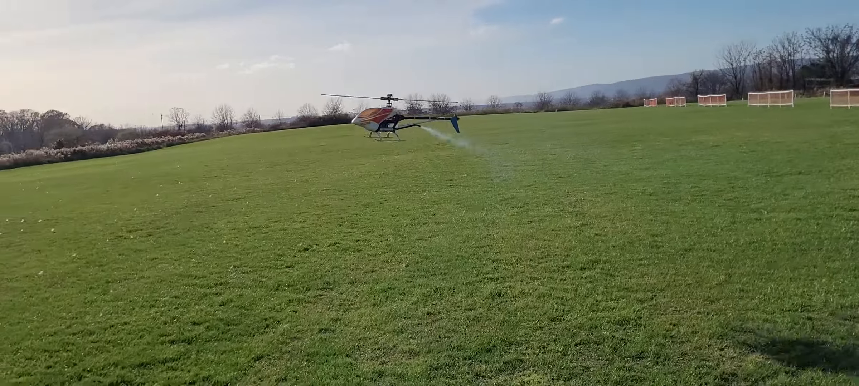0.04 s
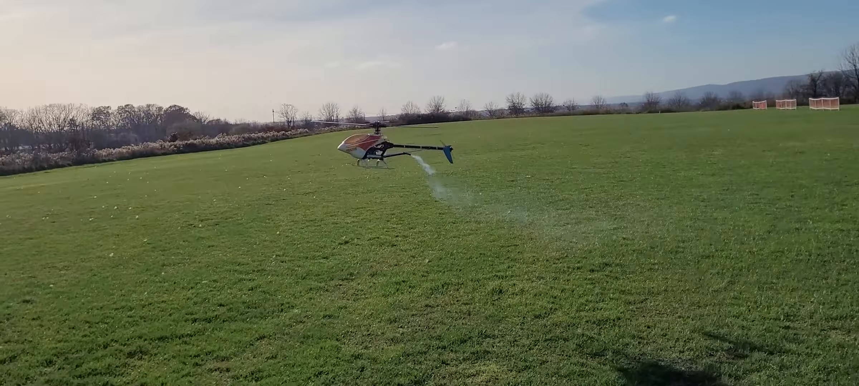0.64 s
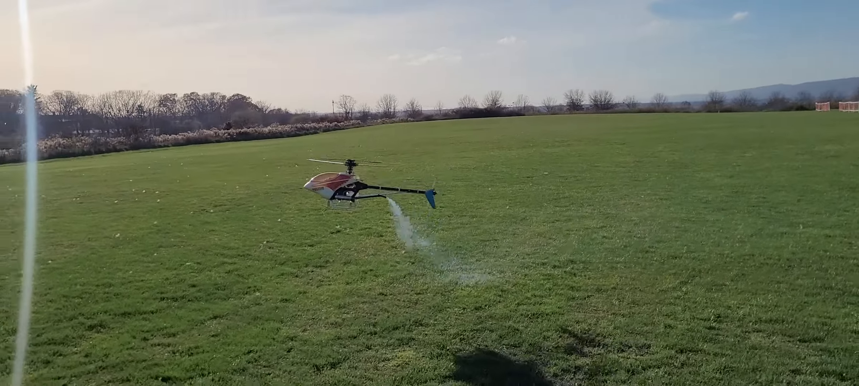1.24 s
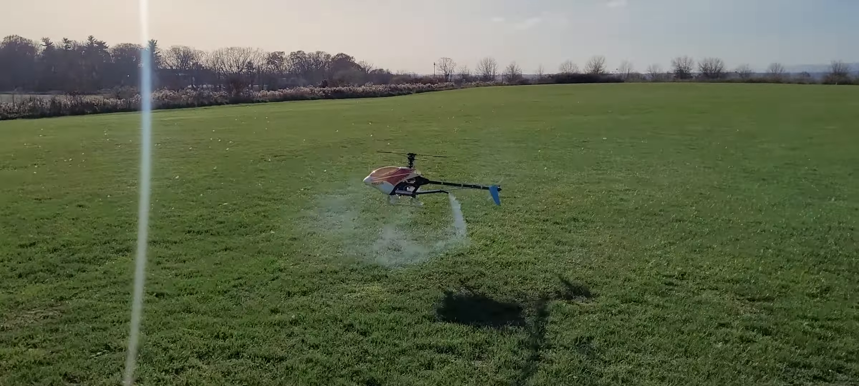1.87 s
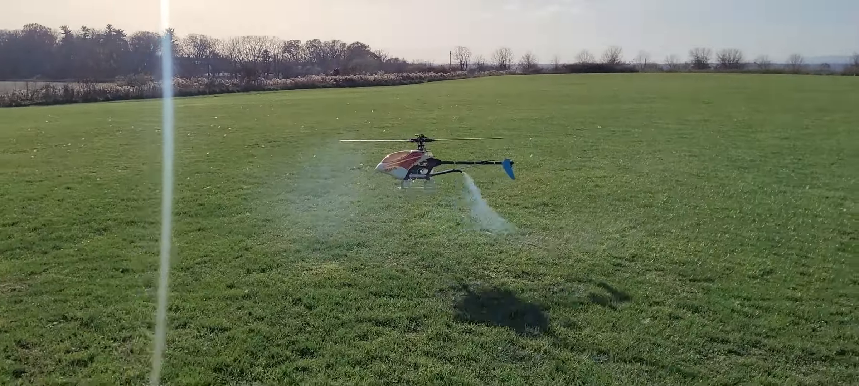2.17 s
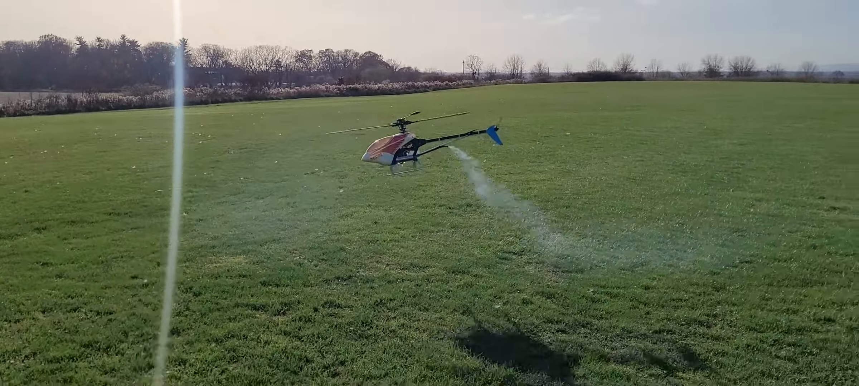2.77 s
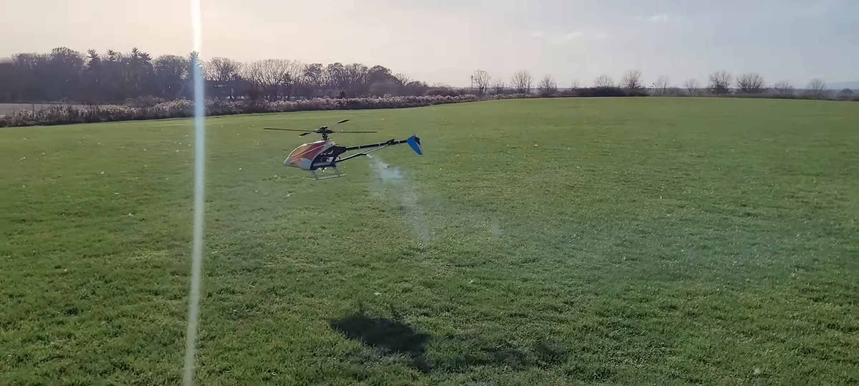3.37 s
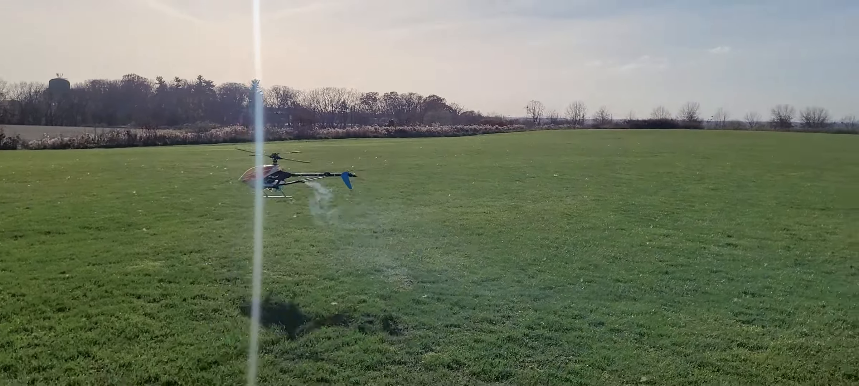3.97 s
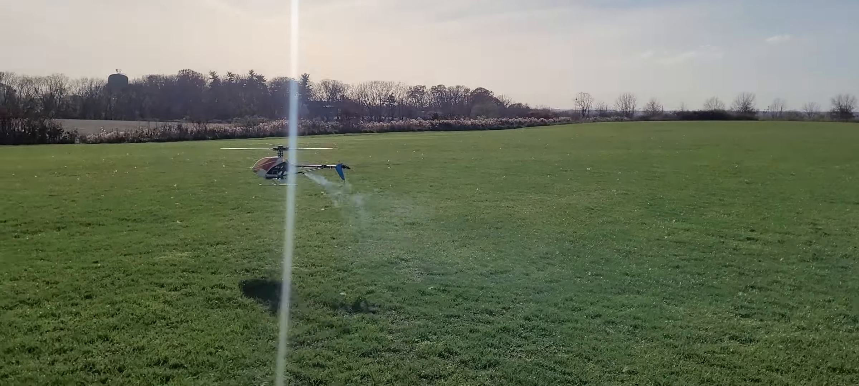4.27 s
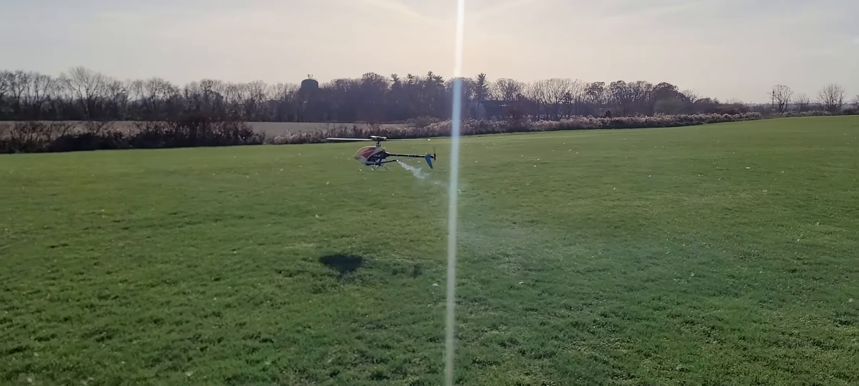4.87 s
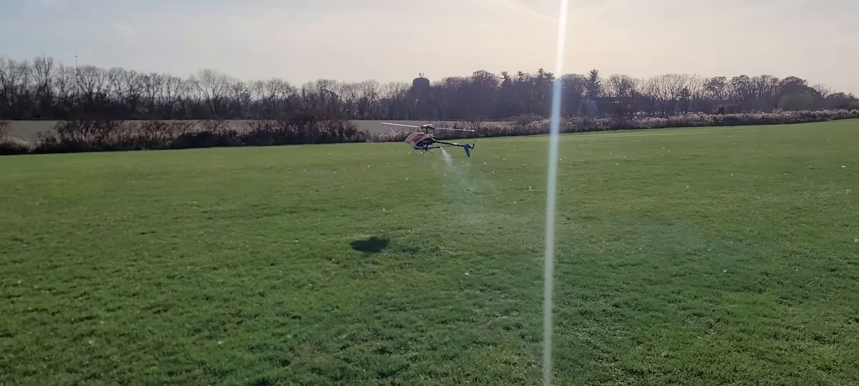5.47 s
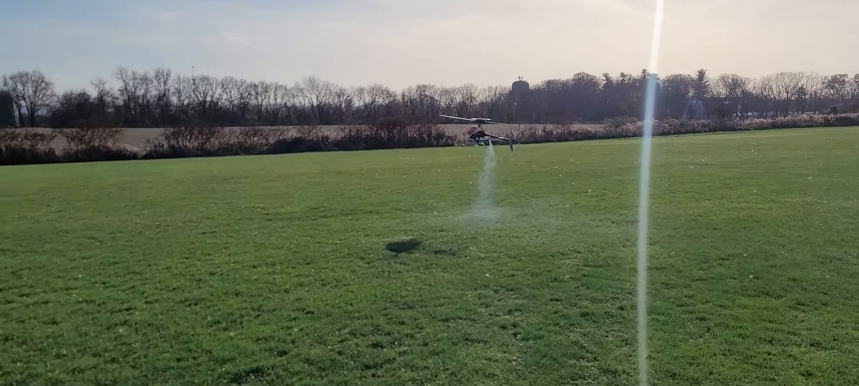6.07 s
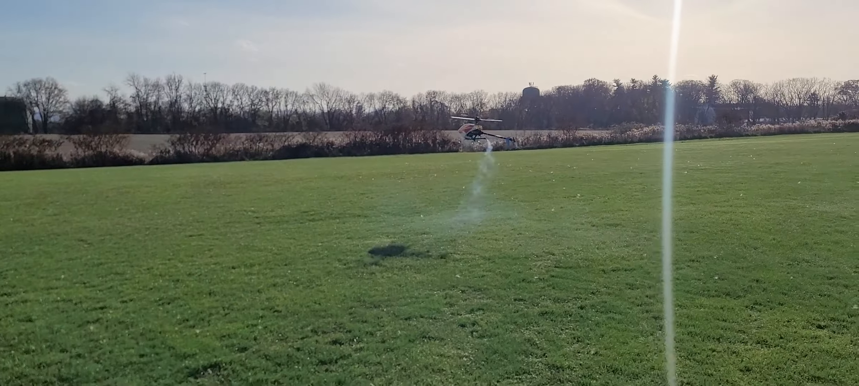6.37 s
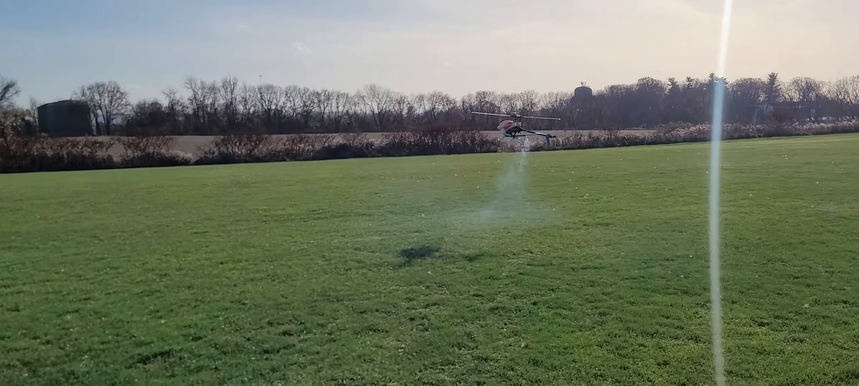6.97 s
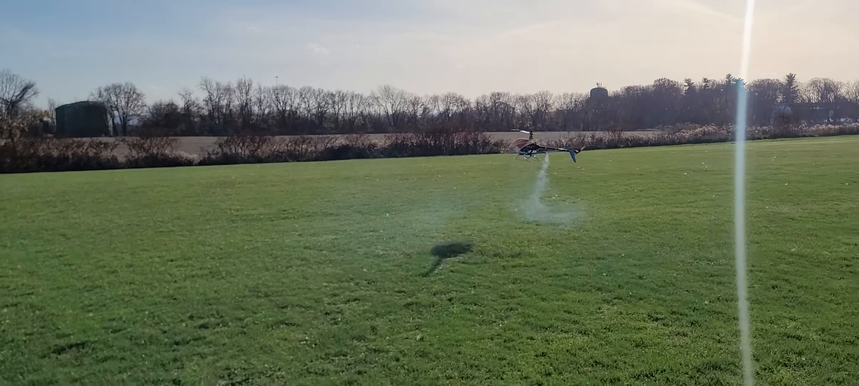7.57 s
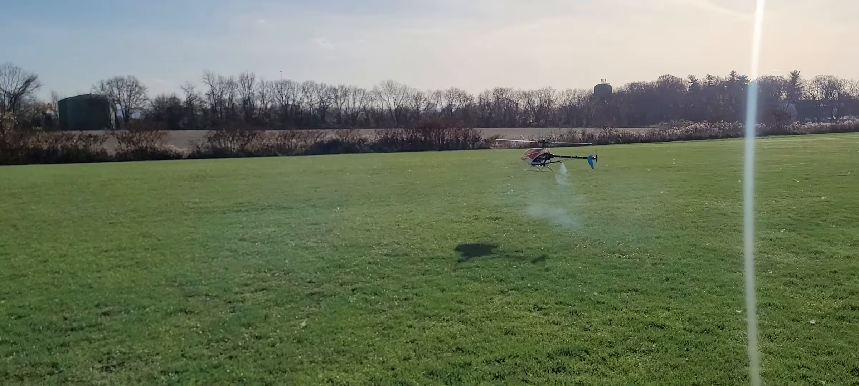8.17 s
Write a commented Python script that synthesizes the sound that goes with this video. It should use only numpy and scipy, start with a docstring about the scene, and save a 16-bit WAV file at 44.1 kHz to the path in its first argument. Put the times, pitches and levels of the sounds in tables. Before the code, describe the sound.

A fuel-powered model helicopter hovers a few metres away over an open grass field, sounding for the whole eight seconds. Its small engine makes a high, raspy buzz of nearly constant pitch, with a sizzling exhaust hiss, thin gear whine and the fast whir and swish of rotor blades. The tone shifts gently in colour as it moves. From about 1.5 to 3.7 seconds it comes closer and is a little louder, the blade tips giving a fluttering high whistle, and a sharp gear whine peaks at around 3.6 seconds. After 4 seconds it drifts somewhat farther off, with less rotor wash but a still clear buzz. From about 6.5 seconds the pitch rises slightly and the exhaust gains a snarling edge. Light wind rumbles on the microphone, with soft low bumps in the first two seconds and again from about 6.3 seconds.

```python
"""A grass field, where a glow-fuel model helicopter hovers a few metres off, nears and drifts away.
Its two-stroke engine is a periodic source: the exhaust pulses buzz through a muffler as a series of
harmonics, or orders. Fixed gears lock both rotors to the firing rate, so sum and difference tones arise.
The blades thump and swish and their tips whistle. The echo off the grass interferes with the direct
sound, and gusts of air rumble on the two ports of a microphone."""
import sys
import numpy as np
from scipy import signal
from scipy.fft import rfft, irfft
from scipy.io import wavfile
from scipy.ndimage import map_coordinates

SR = 44100
rng = np.random.default_rng(int(sys.argv[2]) if len(sys.argv) > 2 else 0)


def generate_wav(sig):
    """Save sig (samples, or channels by samples) to the path in sys.argv[1] as 16-bit PCM at SR."""
    pcm = np.round(np.clip(np.atleast_2d(sig).T, -1, 1) * 32767).astype(np.int16)
    wavfile.write(sys.argv[1], SR, pcm)


N = 362943
T, HZ = np.arange(N) / SR, np.fft.rfftfreq(N, 1 / SR)

# firing rate of the engine: t/s, f/Hz
FIRING_RATE = [(0, 278.4), (1, 276.8), (1.25, 278.5), (1.75, 279.1), (2.7, 276.8), (3.5, 276.5),
               (4.25, 275.3), (4.5, 276.7), (4.75, 277.4), (5.3, 276.6), (6, 278.8), (6.5, 279.6),
               (7.25, 283.4), (7.6, 283.8), (8.23, 283.5)]
# range of the craft: t/s, distance/m
DISTANCE = [(0, 5.3), (.8, 6.2), (1.2, 5.4), (3, 4.6), (3.75, 3), (4.4, 7.6), (6, 6.1), (7.1, 7.9),
            (8.23, 7.9)]
# lag of the ground echo, and of the right port behind the left: t/s, delay/ms
ECHO_LAG = [(0, 2.0), (.7, 2.08), (1.5, 2.33), (1.9, 2.25), (2.8, 2.24), (3.2, 2.38), (3.6, 2.18),
            (4.1, 2.23), (4.6, 2.08), (5.6, 2.05), (6.2, 2.18), (6.8, 2.25), (7.4, 2.0), (7.9, 1.95),
            (8.23, 2.05)]
PORT_LAG = [(0, 0.00079), (1.2, 0.018), (2.3, -0.029), (3.2, 0.053), (4.2, 0.067), (5.2, 0.0026),
            (6.1, -0.045), (6.7, -0.026), (7.3, -0.068), (8.23, -0.065)]
# left port against right: f/Hz, phase lead/rad
PORT_PHASE = [(250, 0), (1100, .3), (1660, .62), (1940, 1.35), (2230, -.2), (2500, -1.2), (3000, -.6),
              (5600, .75), (6200, -.5), (7600, .7), (9200, -2.2), (11000, -1.15), (13500, -2.3),
              (16000, -3.3)]
# left port against right: f/Hz, level difference/dB
PORT_BALANCE = [(200, 1.4), (1100, 0.22), (1700, 1), (2600, 4.2), (4400, 2.4), (8100, 4.8), (15000, 0.61)]

# gusts on the ports: t/s, level/dB, left minus right/dB
GUSTS = [(.163, -25, 2), (.447, -35, -2), (0.566, -24.5, -4), (.838, -27, 3), (0.975, -24.5, 2),
         (1.199, -30, -2), (2.099, -27, -4), (6.304, -32, 5), (6.775, -30, 13), (6.98, -29, 0),
         (7.103, -24, -4), (7.445, -28, -5), (7.533, -34, 2), (8.168, -27, 0), (8.217, -25, 2)]
# spectra of the flow noises: f/Hz, relative density/dB
WIND_SPECTRUM = [(15, -22), (30, -5), (50, 11), (80, 9.5), (140, 2), (220, 0), (500, -18.5)]
WASH_SPECTRUM = [(80, -1.5), (170, -3), (330, 2), (500, 1), (700, -3), (1500, -50)]
SWISH_SPECTRUM = [(350, -13), (650, -1), (950, -1), (1300, -9), (2000, -5.5), (2600, -1.5), (8000, -15)]
RUSH_SPECTRUM = [(500, -37), (850, 0), (1080, -3), (1450, -4), (1900, -2), (2600, -38)]
RASP_SPECTRUM = [(1000, -10.5), (1900, -12), (2450, -4), (2850, 0.5), (3300, 11.5), (3800, 9.5),
                 (4400, 9.5), (5100, 10), (5900, -4.5), (6500, -34), (7300, 0), (8600, -49), (11000, -49)]
SIZZLE_SPECTRUM = [(4000, 8), (6400, 12), (7300, 18.5), (8200, 14), (8900, 4), (9500, 16), (10500, 19),
                   (12500, 20.5), (13300, 7), (14000, -10), (16000, -10)]
# envelopes of the flow noises: t/s, relative level/dB
BREEZE_LEVEL = [(0, -39), (2.2, -38.5), (3.2, -48), (4.3, -44), (5.5, -45), (6.6, -43.5), (7.4, -37.5),
                (8.23, -41)]
WASH_LEVEL = [(0, -38.5), (.8, -36), (1.8, -45), (2.9, -40), (3.65, -42), (4.2, -73), (6.3, -82),
              (8.23, -75)]
RUSH_LEVEL = [(0, -41), (1.1, -39.5), (1.55, -36.5), (2.05, -34.5), (2.5, -40), (3, -40), (3.5, -40.5),
              (4.2, -41), (4.9, -40), (5.6, -44), (8.23, -45)]
TIP_LEVEL = [(0, -45), (.25, -43), (1.15, -41.5), (1.65, -38), (2.05, -41), (2.45, -33), (2.64, -41.5),
             (2.78, -39), (2.97, -35), (3.12, -44), (3.3, -43), (3.47, -45), (3.6, -34.5), (3.85, -46.5),
             (4.1, -42.5), (4.6, -56), (6.8, -69), (7.3, -66), (8.23, -56)]
RASP_LEVEL = [(0, -36.5), (1.2, -36), (1.8, -33), (2.3, -33.5), (3, -35), (3.6, -36), (4.2, -39),
              (4.9, -36.5), (6, -38), (7, -39), (8.23, -39.5)]
SIZZLE_LEVEL = [(0, -36), (.7, -37), (1.35, -35), (1.6, -35), (2.5, -35.5), (2.85, -33), (3.15, -40),
                (3.45, -35), (3.62, -27), (3.9, -33), (4.45, -38), (4.6, -34), (5.25, -36), (5.4, -35),
                (6.2, -38.5), (6.75, -41), (7, -37.5), (8.23, -36.5)]
SNARL_LEVEL = [(0, -47), (2.6, -70), (3.1, -60), (6.4, -46), (7.1, -50), (7.55, -37.5), (7.9, -38),
               (8.23, -36)]
# a notch in the hiss that slides as the craft turns: t/s, f/Hz, depth (0-1)
NOTCH = [(0, 2640, 0.9), (2.8, 2770, 0.7), (3.15, 2370, 0.9), (4.4, 2300, 0.3), (5.3, 2250, 0),
         (6.2, 2500, 0), (6.9, 2920, 0), (8.23, 2960, 0)]
# whistle bands of the blade tips: f/Hz, bandwidth/Hz, relative level/dB
TIP_MODES = [(10340, 1200, -10), (13080, 1800, -2), (14700, 1500, -4)]

# tail rotor: t/s, level of its tones/dB, level of its throb against the exhaust/dB
TAIL_LEVELS = [(0, -52, -62), (1, -64, -44), (2, -56, -37.5), (3.2, -62, -42), (3.7, -48, -44),
               (4.3, -45.5, -43), (5, -45.5, -42), (6, -62, -34.5), (7.1, -59, -31), (8.2, -58, -36.5)]
# tones of engine and rotor: firing multiple, blade-pass multiple, relative level/dB
TAIL_TONES = [(0, 1, 7), (0, 2, -33), (0, 3, -3.5)]
THROB_TONES = [(1, 2, -8.5), (2, 1, -13), (5, 1, -16), (11, 1, -11.5)]
HUM_TONES = [(0, 2, -50.5), (0, 3, -70), (1, -1, -49), (1, .5, -55.5), (1, 1, -42.5), (2, 1, -62)]
OUTER_SIDEBANDS = [(1, 2, -48), (1, 3.2, -66)]
# envelopes of the main rotor's tones: t/s, relative level/dB
THUMP_LEVEL = [(0, -50), (.7, -43), (1.05, -53), (1.35, -36), (1.7, -36), (2.05, -47), (3.4, -44.5),
               (4.6, -52), (5.8, -45.5), (7.5, -49), (8.23, -68)]
HUM_LEVEL = [(0, -0.5), (1.9, -0.5), (2.7, 0), (3.3, -3), (3.7, -2.5), (4.05, -5), (5, -8), (6, -7),
             (8.23, -9)]
SLAP_LEVEL = [(0, -48), (.8, -52), (1.3, -57), (2, -82), (3, -55), (4, -63), (6, -62), (7, -55), (8.2, -58)]
# spectral envelope of the blade slap: f/Hz, relative level/dB
SLAP_SPECTRUM = [(300, 12), (420, -14), (480, -2), (560, 7), (680, -15)]

# envelopes of the gear whine, firing tone, highest orders and two thin whines: t/s, level/dB
GEAR_LEVEL = [(0, -64), (.7, -98), (1.8, -39), (2.4, -54), (2.9, -38), (3.3, -35), (3.65, -24),
              (3.95, -31.5), (4.8, -37.5), (5.3, -39.5), (6.2, -40.5), (7.2, -38), (8.2, -35.5)]
FIRING_LEVEL = [(0, -57), (.75, -57), (1.2, -37.5), (1.7, -33.5), (2.9, -36.5), (3.6, -33), (4.8, -37.5),
                (6.8, -40), (8.23, -37)]
TOP_LEVEL = [(0, -38), (.7, -47), (1.4, -43), (1.6, -52), (2.5, -44), (2.85, -35), (3.2, -31.5), (3.6, -40),
             (4.4, -43), (4.6, -42), (5.2, -43), (5.45, -49), (5.8, -42.5), (6.7, -37), (7.15, -41),
             (8.23, -41)]
LOWER_WHINE = [(0, -49), (1, -46), (2.3, -40), (3.3, -51), (4.3, -66), (4.55, -47), (5.25, -47), (5.5, -50),
               (6.7, -46), (7.2, -50), (8.23, -43)]
UPPER_WHINE = [(0, -45), (1.2, -41), (1.6, -54), (4.35, -58), (4.55, -43), (5.25, -41), (5.45, -81),
               (8.23, -84)]
# orders that follow the gear, firing-tone and whine envelopes: order, relative level/dB
GEAR_ORDERS = {21: -8, 29: -5.1}
LOW_ORDERS = {1: 0, 3: -3}
LOWER_WHINE_ORDERS = {33: -5, 34: 0}
UPPER_WHINE_ORDERS = {36: -7, 37: 0}
# the thin whines: envelope, orders
WHINES = [(LOWER_WHINE, LOWER_WHINE_ORDERS), (UPPER_WHINE, UPPER_WHINE_ORDERS)]
# exhaust orders that swell and fade independently: t/s, level/dB
SECOND = [(0, -66), (1.5, -51.5), (2.1, -72), (2.8, -53), (3.1, -44.5), (3.8, -48), (4.5, -53), (6.6, -51),
          (8.23, -57)]
FOURTH = [(0, -33.5), (1.4, -35.5), (2.25, -27), (3.15, -48), (4.1, -44), (4.7, -39), (5.7, -43),
          (6.6, -53.5), (8.23, -41)]
FIFTH = [(0, -41), (1.15, -28.5), (2, -32.5), (2.4, -37.5), (2.8, -27.5), (3.2, -27), (3.85, -40.5),
         (5.25, -30.5), (6.3, -41), (7.3, -39), (8.23, -28)]
SIXTH = [(0.0, -43), (0.07, -41), (0.73, -48.5), (1.49, -31), (1.86, -44.5), (3.37, -30), (3.67, -48),
         (3.78, -35.5), (5.64, -50.5), (6.9, -40), (7.22, -46), (7.82, -38), (8.23, -58)]
SEVENTH = [(0, -32), (.75, -27), (1.6, -44.5), (2.35, -27.5), (2.8, -30), (3, -45), (3.45, -26.5),
           (4, -35.5), (4.65, -28), (5.7, -40), (6, -47), (6.45, -38), (7.7, -30.5), (8.23, -33.5)]
EIGHTH = [(0, -37.5), (.7, -36.5), (1.45, -49), (2.8, -38), (3.5, -46.5), (4.7, -54), (5.7, -32.5),
          (6.3, -28.5), (6.85, -42.5), (7.5, -31), (8.23, -53)]
NINTH = [(0, -37), (1.3, -50), (1.75, -40.5), (2.3, -66), (3.15, -38), (3.7, -60), (4.65, -41.5),
         (5.65, -35.5), (6.2, -45), (7.55, -41.5), (7.9, -28.5), (8.23, -30)]
TENTH = [(0, -71), (2.9, -77), (3.5, -49), (4.2, -40), (4.7, -54), (5.6, -62), (6.1, -46), (7.3, -43),
         (8.23, -56)]
TWELFTH = [(0, -48), (.4, -47), (.7, -56), (1.1, -33), (1.4, -38.5), (2.05, -30.5), (2.8, -34), (3.4, -39),
           (3.8, -56), (5.3, -52), (5.9, -64), (6.35, -44), (7.35, -39.5), (7.9, -45), (8.23, -41)]
THIRTEENTH = [(0, -36), (.45, -47), (.8, -52), (1.1, -37.5), (1.9, -38), (3.3, -41.5), (4.15, -46),
              (4.7, -43), (6.2, -48), (6.9, -60), (8.23, -57)]
# the same by number: order, envelope
LOUD_ORDERS = {2: SECOND, 4: FOURTH, 5: FIFTH, 6: SIXTH, 7: SEVENTH, 8: EIGHTH, 9: NINTH, 10: TENTH, 12:
               TWELFTH, 13: THIRTEENTH}
# muffler response for the remaining orders: f/Hz, relative level/dB
MUFFLER = [(3060, -17), (3340, -34), (3880, -11.5), (4150, -13), (4430, -10.5), (4720, -14), (5000, -11.5),
           (5500, -19.5), (5850, -26), (6100, -17), (6400, -35), (6700, -18), (7000, -24.5), (7500, -14.5),
           (8000, -27), (8350, -25), (8620, -32), (8900, -43), (9450, -14), (12800, -16.5)]


def amp(db):
    """Amplitude ratio of a level in decibels."""
    return 10 ** (np.asarray(db) / 20)


def unit_rms(x):
    """Normalisation to unit mean power."""
    return x / np.sqrt(np.mean(x ** 2) + 1e-20)


def curve(rows, column=1):
    """Linear interpolation of a time table at every sample."""
    columns = np.transpose(rows)
    return np.interp(T, columns[0], columns[column])


def spectrum(rows, hz=HZ):
    """Interpolation of a spectrum on a logarithmic frequency axis."""
    f, value = np.transpose(rows)
    return np.interp(np.log(hz + 1), np.log(f), value)


def wander(rate_hz):
    """Random fluctuation of rms about 1, mostly below the given rate."""
    knots = unit_rms(rng.standard_normal(4096))
    return np.interp(T * 2 * rate_hz, np.arange(len(knots)), knots) * np.sqrt(3 / 2)


def noise(db, correlation):
    """Partial coherence: two correlated channels of shaped noise, of rms 1."""
    left, other = rng.standard_normal((2, N))
    right = correlation * left + np.sqrt(1 - correlation ** 2) * other
    return unit_rms(irfft(rfft([left, right]) * amp(db), N))


def tone(turns):
    """Simple harmonic motion of rms 1."""
    return np.sqrt(2) * np.cos((2 * np.pi * (turns % 1)).astype(np.float32))


def pulse(turns, at, width):
    """A periodic Gaussian pulse; position and width are fractions of a turn."""
    return np.exp(-.5 * (((turns - at + .5) % 1 - .5) / width) ** 2)


def combination_tones(rows, firings, passes):
    """Modulation: sum and difference tones of engine and rotor, each wavering in level."""
    return sum(amp(db + wander(rate_hz=3.4)) * tone(a * firings + b * passes) for a, b, db in rows)


def resonate(x, hz, width_hz):
    """Damped resonance of unit gain, whose centre frequency may move."""
    carrier = np.exp(2j * np.pi * np.cumsum(hz * np.ones(N)) / SR)
    pole = np.exp(-np.pi * width_hz / SR)
    return 2 * (carrier * signal.lfilter([1 - pole], [1, -pole], x / carrier)).real


def notched(x):
    """Cancellation: subtracting a resonance cuts a moving notch."""
    return x - curve(NOTCH, 2) * resonate(x, curve(NOTCH), width_hz=260)


def spreading_db(reference_m=4):
    """Spherical spreading: pressure falls inversely with distance."""
    return 20 * np.log10(reference_m / curve(DISTANCE))


def ground_db(lag_turns, hz, grass_hz=12000):
    """Interference: the ground echo strengthens or weakens a tone; grass absorbs the treble."""
    reflection = .45 / (1 + (hz / grass_hz) ** 2)
    return 10 * np.log10(1 + np.sqrt(2) * reflection / (1 + reflection ** 2) * tone(lag_turns))


def ports(x):
    """Path difference delays one port against the other; their housing shades and phase-shifts bands."""
    lag_s = curve(PORT_LAG) / 1000
    channels = []
    for side, channel in zip((1, -1), x):
        response = amp(side * spectrum(PORT_BALANCE) / 2) * np.exp(.5j * side * spectrum(PORT_PHASE))
        shaded = irfft(rfft(channel) * response, N)
        position = (T + side * lag_s / 2) * SR
        channels.append(map_coordinates(shaded, [position], order=5, mode="mirror"))
    return np.array(channels)


def wind(push_hz=107, push_s=.0043, churn_s=.03, churn_db=-10):
    """Turbulence rumbles on the ports; each gust is a push of pressure with air churning around it."""
    power = amp(curve(BREEZE_LEVEL) + 2.5 * wander(rate_hz=7.5)) ** 2
    pushes = np.zeros((2, N))
    for at_s, db, pan_db in GUSTS:
        near = abs(T - at_s) < .2
        t = T[near] - at_s
        hz = push_hz * rng.uniform(.66, 1.16)
        push = np.exp(-(t / push_s) ** 2) * np.cos(2 * np.pi * (hz * t + rng.random()))
        pushes[:, near] += amp([[db + pan_db / 2], [db - pan_db / 2]]) * push
        power[near] += amp(db + churn_db) ** 2 * np.exp(-(t / churn_s) ** 2)
    return pushes + np.sqrt(power) * noise(spectrum(WIND_SPECTRUM), correlation=.3)


def gears(firings):
    """Fixed ratios: the gears whine at two multiples of the firing rate."""
    return amp(curve(GEAR_LEVEL)) * sum(amp(db) * tone(k * firings) for k, db in GEAR_ORDERS.items())


def tail_rotor(firings):
    """Beating: the blades pass just under the firing rate; the wake makes the throb uneven."""
    passes = .9475 * firings
    throb_gain = amp(curve(TAIL_LEVELS, 2) + .67 * wander(rate_hz=3.8))
    throb = throb_gain * combination_tones(THROB_TONES, firings, passes + .14 * wander(rate_hz=9))
    return amp(curve(TAIL_LEVELS)) * combination_tones(TAIL_TONES, firings, passes) + throb


def blade_tips(facing, glide_hz_per_turn=30000):
    """Narrow-band noise: each approaching tip whistles through three bands in rising order."""
    tips_db = curve(TIP_LEVEL)
    trough = .16 * amp(-.3 * (tips_db - tips_db.max() + 8))  # loud whistles pulse more deeply
    whistle = 0
    for hz, width_hz, db in TIP_MODES:
        phase = facing - (hz - TIP_MODES[1][0]) / glide_hz_per_turn
        flashes = trough + pulse(phase, at=0, width=.048) + .35 * pulse(phase, at=.48, width=.048)
        band_db = -20 * np.log10(1 + (2 * (HZ - hz) / width_hz) ** 2)
        whistle += amp(db) * unit_rms(flashes) * noise(band_db, correlation=.17)
    return amp(tips_db + 9.5 + 1.8 * wander(rate_hz=4.5)) * whistle


def blade_slap(facing, rotor_hz):
    """Blade-wake interaction: rotor harmonics, the odd ones weak as the two blades are nearly alike."""
    slap = 0
    for k in range(12, 24):
        db = spectrum(SLAP_SPECTRUM, k * rotor_hz) - 10 * (k % 2)
        slap += amp(db) * tone(k * facing + .19 * wander(rate_hz=2))
    return amp(curve(SLAP_LEVEL)) * slap


def blade_air(facing):
    """Amplitude modulation: a low wash, a swish and a rush of air swell with each passing blade."""
    passing = unit_rms(1 + pulse(2 * facing, at=0, width=.34))
    wash = amp(curve(WASH_LEVEL) - 2.5) * noise(spectrum(WASH_SPECTRUM), correlation=1)
    swish_db = -36.5 + .21 * spreading_db()  # follows the distance only in part
    swish = amp(swish_db) * notched(noise(spectrum(SWISH_SPECTRUM), correlation=.97))
    rush_db = curve(RUSH_LEVEL) + 2.1 * wander(rate_hz=6.6)
    rush = amp(rush_db) * noise(spectrum(RUSH_SPECTRUM), correlation=.65)
    return passing * (wash + swish + rush)


def main_rotor(firings, firings_per_turn=9.55):
    """Periodic forcing: two blades thump at the blade-pass rate and hum as each firing shakes them."""
    turns = firings / firings_per_turn
    passes = 2 * turns
    # rotor phase, counted from where a blade faces the listener
    facing = turns - np.interp(T, [0, 3, 4.5, 8.2], [.316, .273, .208, .171])
    thump = amp(curve(THUMP_LEVEL) + 2.85 * wander(rate_hz=8.5)) * tone(passes)
    hum_db = curve(HUM_LEVEL)
    hum = amp(hum_db) * combination_tones(HUM_TONES, firings, passes)
    hum += amp(2.1 * hum_db) * combination_tones(OUTER_SIDEBANDS, firings, passes)
    slap = blade_slap(facing, rotor_hz=turns[-1] / T[-1])
    return thump + hum + slap + blade_air(facing) + blade_tips(facing)


def exhaust_gas(firings, snarl_hz=2216, width_hz=110):
    """Pulsed flow: gas rasps and sizzles out at each firing, and noise excites a muffler resonance."""
    puffs = 1.2 + pulse(firings, at=0, width=.39) + .19 * pulse(firings, at=.5, width=.063)
    spurts = .45 + pulse(firings, at=0, width=.081) + .5 * pulse(firings, at=.33, width=.069)
    rasp = amp(curve(RASP_LEVEL)) * notched(noise(spectrum(RASP_SPECTRUM), correlation=.68))
    sizzle_db = curve(SIZZLE_LEVEL) + wander(rate_hz=15)
    sizzle = amp(sizzle_db) * noise(spectrum(SIZZLE_SPECTRUM), correlation=.21)
    ringing = resonate(rng.standard_normal(N), snarl_hz, width_hz)
    snarl = amp(curve(SNARL_LEVEL)) * unit_rms(resonate(ringing, snarl_hz, width_hz))
    return unit_rms(puffs) * rasp + unit_rms(spurts) * sizzle + snarl


def order_db(k, hz):
    """Source and filter: order k has its own envelope, or is shaped by the muffler and ground echo."""
    if k in LOW_ORDERS:
        return curve(FIRING_LEVEL) + LOW_ORDERS[k]
    if k in LOUD_ORDERS:
        return curve(LOUD_ORDERS[k])
    buzz_db = -30 + spreading_db()
    top_share = np.clip((k - 20) / 14, 0, 1)
    db = (1 - top_share) * buzz_db + top_share * curve(TOP_LEVEL) + spectrum(MUFFLER, hz)
    db += ground_db(k * curve(FIRING_RATE) * curve(ECHO_LAG) / 1000, hz)
    db += 3.76 * wander(rate_hz=2.6)  # moving air makes the level drift
    for envelope, orders in WHINES:
        if k in orders:
            db = 20 * np.log10(np.hypot(amp(db), amp(curve(envelope) + orders[k])))
    return db


def engine(firings, spread_turns=.087):
    """Fourier series: exhaust pulses, each a little early or late, are a sum of 47 orders."""
    turns = firings + .0013 * wander(rate_hz=110) + .0015 * wander(rate_hz=14)
    mean_hz = firings[-1] / T[-1]
    buzz = np.zeros(N)
    for k in range(1, 48):
        db = order_db(k, k * mean_hz)
        flutter_db = 2.1 * min(k / 16, 1) ** 2 * wander(rate_hz=14)  # downwash shakes short waves most
        # the pipe delays the higher orders, spreading each pulse over its cycle
        dispersion = 0 if k in LOW_ORDERS else -spread_turns * k * k + .002 * k * wander(rate_hz=8)
        buzz += amp(db + flutter_db) * tone(k * turns + dispersion)
    firing_strength = 1 + .1 * wander(rate_hz=120) + .058 * wander(rate_hz=12)
    return firing_strength * buzz


def scene():
    """Superposition: one engine phase drives every part of the craft, and wind adds at the ports."""
    firings = np.cumsum(curve(FIRING_RATE)) / SR
    motor = engine(firings) + gears(firings) + exhaust_gas(firings)
    return ports(motor + main_rotor(firings) + tail_rotor(firings)) + wind()


def record(dry):
    """Band limiting: the microphone passes sound below a steep treble edge."""
    lowpass = signal.firwin(511, 15900, window=("kaiser", 9), fs=SR)
    return signal.oaconvolve(dry, lowpass[None], "same")


dry = scene()
out = record(dry)
generate_wav(out)
```